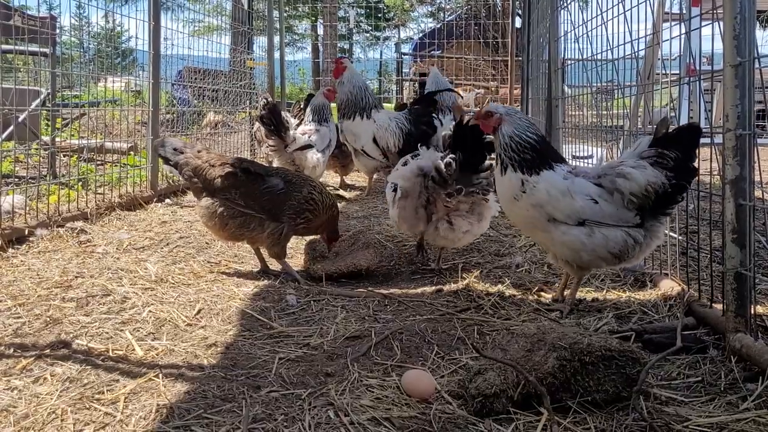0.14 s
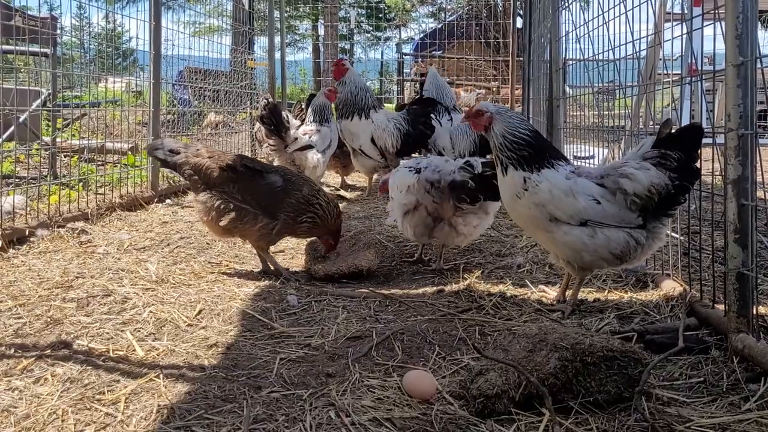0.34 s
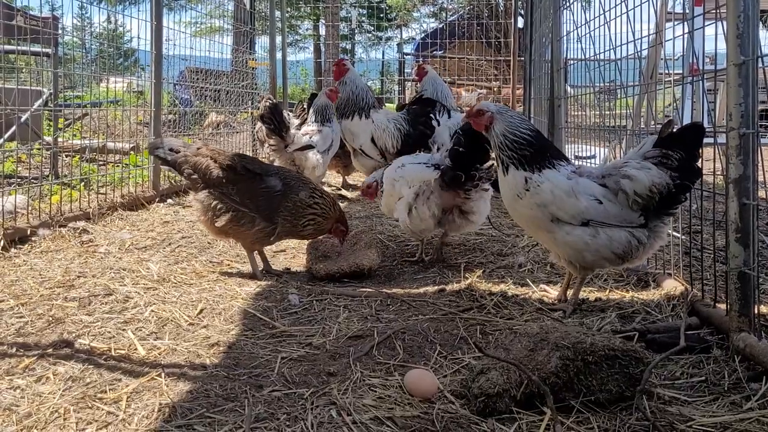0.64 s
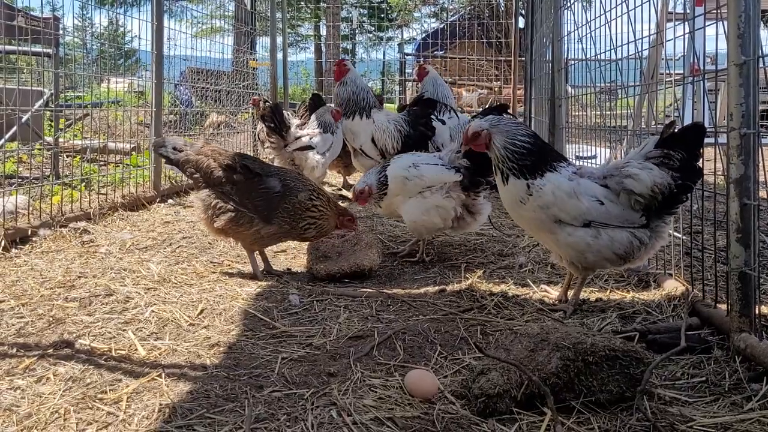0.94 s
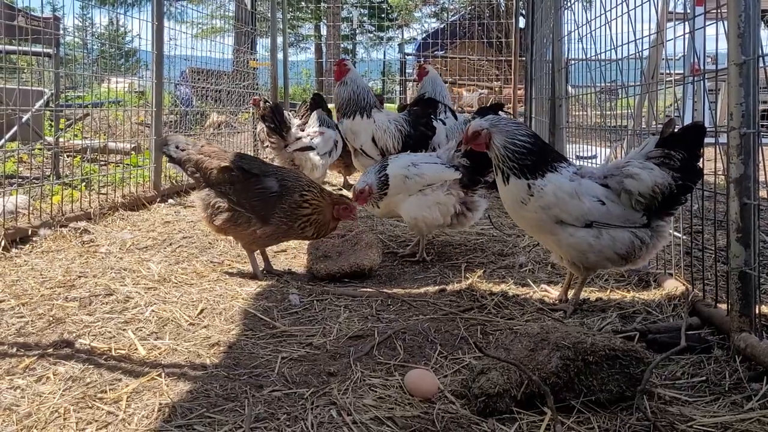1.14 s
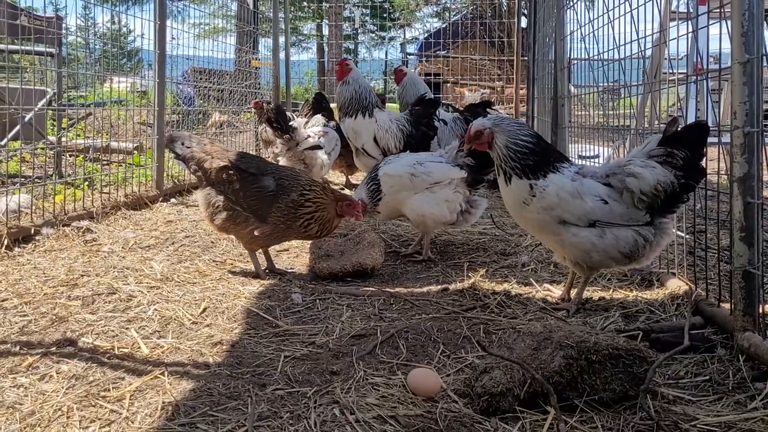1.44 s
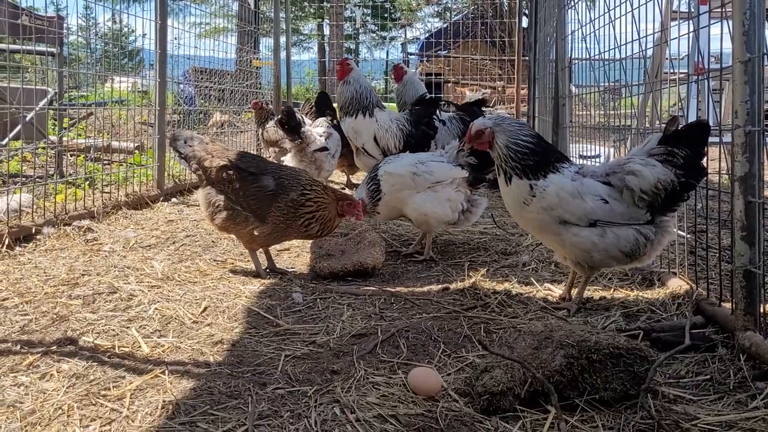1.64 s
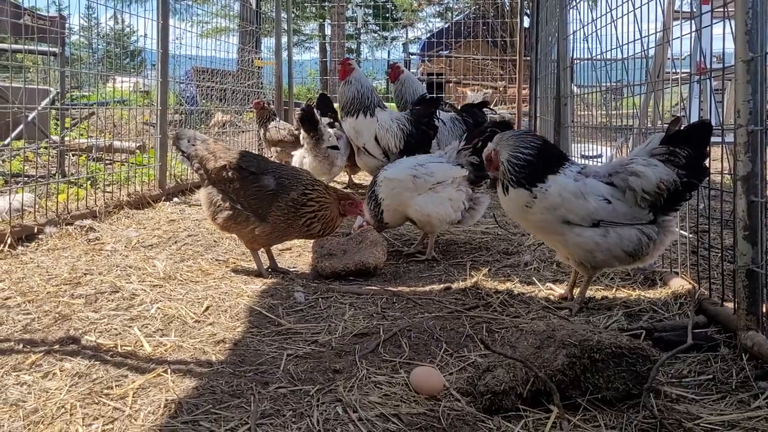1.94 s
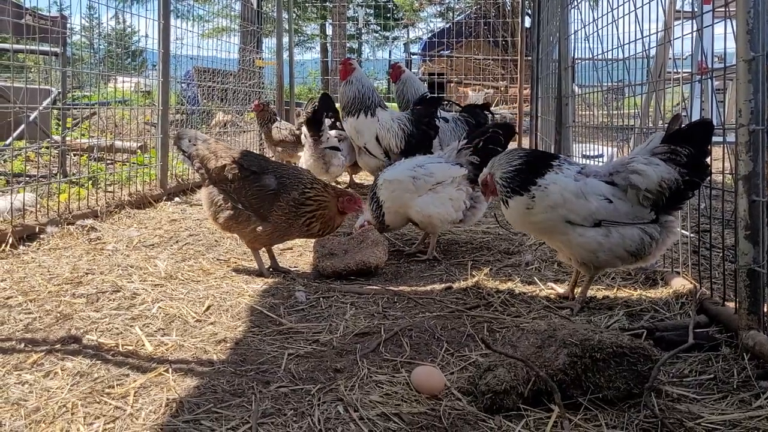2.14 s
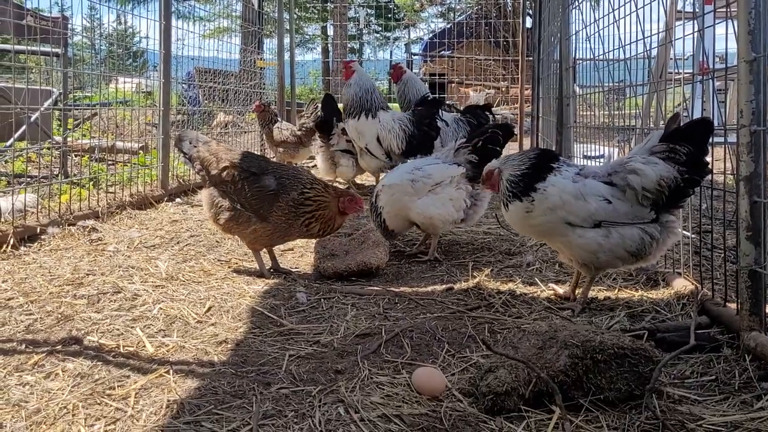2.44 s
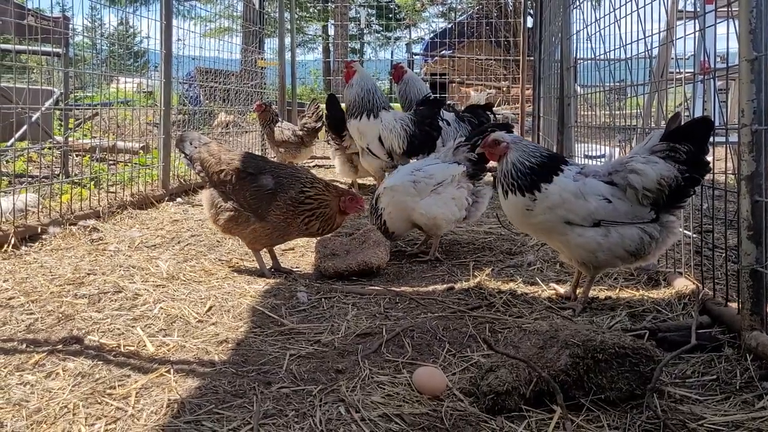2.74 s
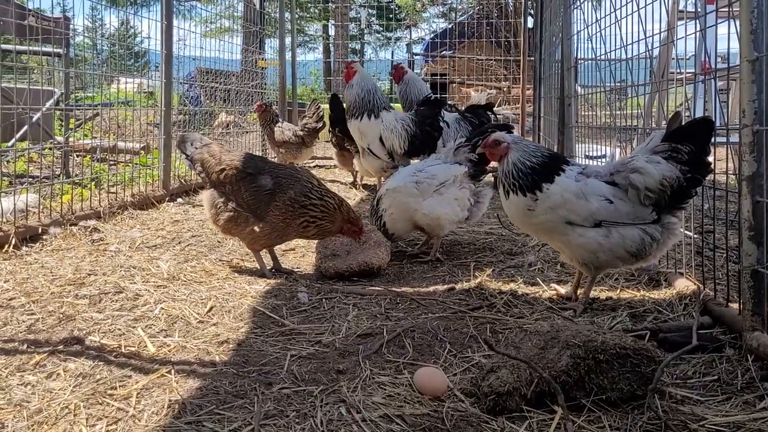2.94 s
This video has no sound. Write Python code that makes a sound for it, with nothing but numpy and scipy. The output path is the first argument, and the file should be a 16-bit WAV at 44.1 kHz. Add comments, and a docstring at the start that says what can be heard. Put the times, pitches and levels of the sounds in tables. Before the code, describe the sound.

Close chicken clucks outdoors: a quick cluster, a brief bright squawk from a second hen, a sparse gap, then regular clucks to the end. Wind buffets mostly the left side of the stereo microphone; faint bird whistles behind.

```python
"""An outdoor wire pen: a hen close by clucks, irregularly at first, then in an even run.
Rough pulses and breath ring its throat; a second voice gives one long cackle of summed harmonics plus rasp.
A farther hen clucks softly, a small bird whistles gliding, mostly falling sines, and beaks tick on dry feed.
Wind is gust-shaped low noise, mostly in the left microphone port, over a faint noise of the yard."""
import sys
import numpy as np
from scipy import signal
from scipy.fft import rfft, irfft, next_fast_len
from scipy.io import wavfile
from scipy.ndimage import map_coordinates

SR = 44100
rng = np.random.default_rng(int(sys.argv[2]) if len(sys.argv) > 2 else 0)


def dump(signal):
    """Clip the signal to [-1, 1] and save it as 16-bit WAV at the path in sys.argv[1]."""
    limited = np.clip(np.atleast_2d(signal).T, -1, 1)
    pcm = np.round(limited * 32767).astype(np.int16)
    wavfile.write(sys.argv[1], SR, pcm)


N = 136710
T = np.arange(N) / SR  # seconds

# Clucks of the near hen. Each row: start in seconds, length in seconds, level in dB, top pitch in Hz,
# roughness 0-1, period doubling 0-1, gain at 1.5-2.9 kHz in dB, peak time as a share of the length,
# gain above 2.9 kHz in dB, gain below 560 Hz in dB.
NEAR_CLUCKS = [(-.02, .065, -27, 471.2, 0.45, 0.09, 7.5, 0.37, 5, -4.5),
               (.11, 0.068, -25.5, 373.8, 0.31, 0.59, -2.5, 0.5, -6.5, -10.5),
               (.239, 0.037, -25.5, 397.4, 0.64, 0.56, 0, 0.32, -4, -6.5),
               (.44, 0.042, -28.5, 380.7, 0.58, 0.23, -8, 0.337, -7, -6),
               (.942, 0.065, -36, 377.3, 0.49, 0.33, 5.5, 0.6, -12, 7.5),
               (1.195, 0.061, -29, 432, 0.36, 0.32, -1.5, 0.48, -1, -2.5),
               (1.415, 0.064, -33.5, 401.3, 0.54, 0.19, 2, 0.51, -10, 5),
               (1.638, 0.066, -28.5, 446.2, 0.3, 0.27, 8, 0.57, 2, 2),
               (1.853, 0.068, -29.5, 434.5, 0.42, 0.38, 6, 0.44, 1, 2),
               (2.071, 0.076, -32.5, 274, 0.62, 0.28, 3, 0.3, 2, -1),
               (2.312, 0.07, -23.5, 459.3, 0.29, 0.46, 5.5, 0.48, 2, -3.5),
               (2.563, 0.07, -26.5, 448.5, 0.33, 0.39, 5, 0.6, 1, 2.5),
               (2.803, 0.066, -28, 444.2, 0.32, 0.51, 4, 0.5, -4.5, 2),
               (3.034, 0.067, -26, 447, 0.33, 0.45, 2, 0.56, -5.5, 2.5)]
# Throat resonances of the near hen. Each row: centre in Hz, width in Hz, gain in dB.
NEAR_THROAT = [(397.44, 740, -5), (766, 640, 1), (1210, 270, -10.5), (2172, 560, 0), (3120, 146, -11.5),
               (4085, 860, -11), (5820, 1110, -14), (6800, 1250, -13.5), (10900, 2000, -30),
               (15000, 4400, -34)]
BANDS_HZ = (560, 1500, 2900)  # borders of the bands that each cluck weights
START_PITCH, END_PITCH = 0.57, 0.56  # shares of the top pitch
EDGE_DB, EDGE_ROUGH = -13.5, 1.004  # at a cluck's edges: level change, added share of its roughness
EDGE_DULL_DB, EDGE_AIR_DB = -9, -20  # at the edges: change in the 1.5-2.9 kHz band and above it
JITTER = 0.065  # pitch deviation, as a share, at roughness 1
PULSE_SPREAD = 0.3485  # radians per squared harmonic number: smears each pulse
CLUCK_DRIFT_DB, OVERTONE_DRIFT_DB = 1.5, 4  # slow drift of each harmonic

# Course of the cackle. Each row: time in seconds, pitch in Hz, level of the fundamental in dB,
# level of the second harmonic in dB, level of the higher harmonics in dB.
CACKLE_COURSE = [(0.26, 792, -46, -35.5, -57), (0.272, 750, -19, -34, -56), (0.276, 759.3, -18.5, -61, -39),
                 (0.288, 759.4, -18, -47, -42), (0.297, 807, -28, -29, -32), (0.306, 818, -42, -32, -30),
                 (0.315, 794, -28, -34, -40.5), (0.326, 815.3, -41, -26, -31),
                 (0.349, 804.6, -29, -39.5, -29), (0.375, 807.3, -32, -27, -26),
                 (0.389, 790.3, -23.5, -29, -32), (0.431, 781.5, -21, -26, -29.5),
                 (0.451, 765.6, -22.5, -34, -38), (0.471, 680, -32, -66, -66)]
# Voice irregularity in the cackle. Each row: time in seconds, roughness 0-1, period doubling 0-1.
CACKLE_HOARSENESS = [(.26, .2, .3), (.286, .1, .2), (.296, .04, .55), (.335, .03, .5), (.35, .025, .05),
                     (.43, .025, .04), (.45, .07, .1), (.47, .2, .1)]
# Relative levels in dB of harmonics 3, 4, 5 and up.
UPPER_HARMONICS_DB = [0, -11.5, -4.5, -16.5, -11, -19.5, -25.5, -25, -33.5, -33.5, -39, -43, -30.5, -31,
                      -37, -29, -36]
# Resonances that colour the rasp. Each row: centre in Hz, width in Hz, gain in dB.
RASP_RESONANCES = [(764, 410, -3), (1636, 510, -2), (2780, 620, -6.5), (3690, 800, 1.5), (6540, 510, -19),
                   (7560, 1300, -34), (12100, 3600, -36.5)]
# Strength of the rasp. Each row: time in seconds, level in dB.
RASP_COURSE = [(.26, -24.5), (.288, -24), (.3, -28.5), (.335, -33.5), (.35, -57), (.43, -52), (.455, -30.5),
               (.47, -41)]
# Resonances of air hissing past the beak. Each row: centre in Hz, width in Hz, gain in dB.
HISS_RESONANCES = [(7000, 1700, -3), (13400, 2800, -1)]
HISS_DB, CACKLE_LOW_HZ = -59, 600  # hiss level; low cut of the harmonics

# Clucks of the farther hen. Each row: start in seconds, length in seconds, level in dB.
FAR_CLUCKS = [(0.581, .04, -49), (0.724, 0.042, -47.5), (0.859, 0.045, -58), (1.38, 0.066, -63.5),
              (1.947, 0.04, -73), (2.388, .04, -60), (2.651, 0.046, -57.5), (2.906, 0.038, -62),
              (2.981, 0.038, -56)]
# Throat resonances of the farther hen. Each row: centre in Hz, width in Hz, gain in dB.
FAR_THROAT = [(2330, 900, 0.5), (2390, 300, -4.5), (4450, 1300, -13), (1470, 240, -13)]
FAR_HZ, FAR_ROUGH = 435, 0.1  # top pitch, roughness 0-1

# Beaks on dry feed. Each row: start in seconds, initial level in dB before resonance.
BEAK_TICKS = [(1.57, -57), (1.604, -60), (1.6235, -59), (1.7835, -58)]
# Notes of the small bird. Each row: start in seconds, length in seconds, first pitch in Hz,
# middle pitch in Hz, last pitch in Hz, level in dB.
BIRD_NOTES = [(.772, 0.019, 4157, 4150, 4070, -55.5), (1.818, 0.019, 3050, 3000, 2900, -67),
              (2.266, 0.033, 2750, 2530, 2400, -64), (2.74, 0.036, 3192, 3430, 3800, -63),
              (0.811, 0.036, 3700, 2870, 2340, -59.5), (0.895, 0.031, 3780, 2800, 2770, -57),
              (1.394, 0.058, 3045, 3270, 3076, -63), (1.489, 0.077, 4050, 3460, 2500, -54.5),
              (1.55, 0.037, 2460, 2250, 2190, -55.5), (1.572, 0.032, 3200, 3190, 3146, -66),
              (1.697, 0.071, 3740, 2850, 2100, -56.5), (2.026, 0.092, 2970, 3212, 2870, -56.5),
              (2.221, 0.081, 3270, 3003, 2660, -59), (2.389, 0.033, 3330, 3095, 2900, -55),
              (2.53, 0.048, 3047, 3217, 2927, -56.5), (2.621, 0.031, 3360, 3160, 2820, -49),
              (2.769, 0.043, 3855, 3390, 2730, -48.5), (2.96, 0.058, 3770, 3250, 2260, -51)]
WAVER, WAVER_DB = 0.014, 3  # unsteadiness of pitch as a share, and of level

# Gusts. Each row: time in seconds, relative strength in dB, left over right in dB.
GUSTS = [(0.0, -56, 7), (0.05, -43, 14), (0.09, -56, 15), (0.13, -37.5, 19.5), (0.21, -30, 45),
         (0.27, -71.5, 5), (0.33, -59, 3), (0.36, -33.5, 17.5), (0.42, -36.5, 35), (0.46, -32.5, 26),
         (0.6, -37, 25), (0.74, -28.5, 44), (0.81, -30, 19), (0.93, -53, 17), (1.07, -43, 36),
         (1.16, -48.5, -5.5), (1.3, -59, 11), (1.5, -50.5, 19), (1.55, -62.5, 1), (2.24, -60, 3),
         (2.3, -42.5, 34), (2.35, -60, 0), (2.5, -54.5, 18), (2.68, -40, 0.5), (2.71, -61, 3),
         (2.74, -35.5, -15), (2.8, -35, -5), (2.93, -51.5, -2.5), (3.06, -39, -4), (3.1, -48, 10)]
# Spectrum of the slow wind pressure. Each row: frequency in Hz, relative density in dB per Hz.
RUMBLE_SPECTRUM = [(20, -1.5), (70, 8.5), (120, -6), (178, -20.5), (214, -29), (300, -11.5), (390, -86),
                   (660, -120)]
# Spectrum of the faster wind flutter. Each row: frequency in Hz, relative density in dB per Hz.
FLUTTER_SPECTRUM = [(35, -12.5), (60, -19), (124, -0.5), (168, -11), (236, -8.5), (850, -49), (1170, -84),
                    (1980, -120)]
FLUTTER_DB = -0.5  # flutter over rumble in the strongest gust
FLUTTER_GROWS, LUMPY_DB = 2, 4  # dB of flutter per dB of gust; depth of the lumps in dB

# Spectrum of the yard. Each row: frequency in Hz, relative density in dB per Hz.
YARD_SPECTRUM = [(71, -27), (120, 3), (376, -6.5), (722, -8), (850, -3.5), (1420, -7.5), (1920, -9.5),
                 (2170, -14.5), (2720, -12.5), (3010, -17), (5010, -18), (15700, -35)]
# Likeness of the yard at the two ports. Each row: frequency in Hz, left-right correlation.
YARD_LIKENESS = [(130, 1), (300, 1), (640, 0.47), (1400, -0.57), (3100, 0.082), (15000, -0.18)]
YARD_DB = -57.0

# Balance of the ports for most sources. Each row: frequency in Hz, left over right in dB.
PORT_BALANCE = [(250, 3), (700, -4), (1300, 6.5), (2400, 11), (4400, -1.5), (9000, -3), (15000, 0)]
# Balance of the ports for the cackle. Each row: frequency in Hz, left over right in dB.
CACKLE_BALANCE = [(400, 1), (800, -6.5), (1600, 0.5), (2400, 1.5), (4400, 6), (8000, -5), (15000, -2)]
# Decay in the pen and sheds. Each row: frequency in Hz, time to fall 60 dB in seconds.
PEN_DECAY = [(300, 0.29), (2000, 0.68), (6000, 0.53), (12000, 0.59)]
SCATTER_S = 0.022  # scatter from ground, posts and other hens falls 30 dB in this time
SCATTER_DB, CACKLE_SCATTER_DB = -6, -12
NEAR_WET_DB, CACKLE_WET_DB, FAR_WET_DB, BIRD_WET_DB = -18.5, -21, -6, -8  # reverberant tail
# Seconds by which the left port leads (negative: lags), then left-over-right phase in radians.
LEAD_S, CACKLE_LEAD_S, FAR_LEAD_S, BIRD_LEAD_S = 0.00025, 0.0001, 0.00069, -0.0004
NEAR_TURN, CACKLE_TURN = -0.25, 0.64


def amp(db):
    """Decibel definition: the amplitude ratio of a level in dB."""
    return 10 ** (np.asarray(db) / 20)


def unit(x):
    """Normalisation: scales x to an rms of 1."""
    return x / np.sqrt(np.mean(x ** 2) + 1e-20)


def along(points, hz):
    """Interpolation on a logarithmic frequency axis through (Hz, value) points."""
    f, value = np.transpose(points)
    return np.interp(np.log(hz + 1), np.log(f + 1), value)


def curves(rows):
    """Linear interpolation in time: one curve for each column after the first."""
    times, *columns = np.transpose(rows)
    return [np.interp(T, times, column) for column in columns]


def wobble(rate):
    """Band-limited random drift: a smooth curve through rate random knots a second."""
    return map_coordinates(rng.standard_normal(int(N * rate / SR) + 4), [T * rate])


def filtered(x, response):
    """Linear filtering: multiplies the spectrum by a complex response of frequency."""
    size = next_fast_len(N + 8192)
    hz = np.fft.rfftfreq(size, 1 / SR)
    return irfft(rfft(x, size) * response(hz), size)[..., :N]


def resonances(peaks):
    """Resonance: the summed power of steep second-order peaks, as a gain without phase."""
    def gain(f):
        power = 0
        for centre, width, db in peaks:
            damping = (f * width) ** 2
            power = power + (amp(db) * damping / ((centre ** 2 - f ** 2) ** 2 + damping)) ** 2
        return np.sqrt(power)
    return gain


def coloured(spectrum):
    """Spectral shaping: two independent noises, scaled together to an rms of 1."""
    return unit(filtered(rng.standard_normal((2, N)), lambda hz: amp(along(spectrum, hz))))


def membrane_phase(hz, rough):
    """Frequency jitter: the phase of a membrane is the sum of its unsteady pitch."""
    return 2 * np.pi * np.cumsum(hz * (1 + JITTER * rough * wobble(350.8))) / SR


def hoarse(tone, turn, rough, doubling):
    """Period doubling and turbulence: uneven, alternating cycles, and a puff of breath noise in each."""
    uneven = amp(5.8 * np.minimum(rough, 1) * wobble(250)) * (1 + doubling * np.cos(turn / 2))
    breath = uneven * (1 + 0.29 * np.cos(turn)) * rng.standard_normal(N)
    return uneven * tone, breath


def clucking(rows, throat):
    """Source and filter: pulses of arching pitch and level, with breath, ring the throat."""
    gain, hz, rough, doubling = np.zeros(N), np.full(N, 300.0), np.zeros(N), np.zeros(N)
    chest, treble, air = np.ones(N), np.ones(N), np.ones(N)
    for s, length, db, top_hz, r, d, treble_db, peak, air_db, chest_db in rows:
        on = (T >= s) & (T < s + length)
        u = (T[on] - s) / length
        off = np.where(u < peak, 1 - u / peak, (u - peak) / (1 - peak))  # 0 at the peak, 1 at the edges
        ramp = np.minimum(1, 6 * np.minimum(u, 1 - u))
        gain[on] = amp(db + EDGE_DB * off ** 1.8) * ramp
        edge_pitch = np.where(u < peak, START_PITCH, END_PITCH)
        hz[on] = top_hz * (1 - off ** 3 * (1 - edge_pitch))
        rough[on] = r * (1 + EDGE_ROUGH * off ** 2)
        doubling[on] = d
        chest[on] = amp(chest_db)
        treble[on] = amp(treble_db + EDGE_DULL_DB * off)
        air[on] = amp(air_db + EDGE_AIR_DB * off)

    turn = membrane_phase(hz, rough)
    pulses = np.zeros(N)
    for k in range(1, 22):
        drift = amp(CLUCK_DRIFT_DB * wobble(24.93))
        pulses += drift * np.cos(k * turn + PULSE_SPREAD * k * k) / (1 + (k / 11) ** 4)
    tone, breath = hoarse(pulses / 12, turn, rough, doubling)
    source = tone + filtered(rough * breath, lambda f: 0.45 + f / 20000)

    deep, low, middle = [filtered(source, lambda f: 1 / (1 + (f / border) ** 4)) for border in BANDS_HZ]
    source = chest * deep + (low - deep) + treble * (middle - low) + air * (source - middle)
    # The rms without the level curve is the reference for the levels.
    plain = filtered(source * (gain > 0), resonances(throat))[gain > 0]
    return filtered(source * gain, resonances(throat)) / np.sqrt(np.mean(plain ** 2))


def cackle():
    """Harmonic synthesis: a rasping onset, then a clear stack of harmonics whose pitch sags."""
    hz, first_db, second_db, upper_db = curves(CACKLE_COURSE)
    rough, doubling = curves(CACKLE_HOARSENESS)
    rasp_db, = curves(RASP_COURSE)
    turn = membrane_phase(hz, rough)
    upper = np.zeros(N)
    for k, db in enumerate(UPPER_HARMONICS_DB, start=3):
        upper += amp(db + OVERTONE_DRIFT_DB * wobble(20.36)) * np.cos(k * turn + k * k)
    stack = amp(first_db) * np.cos(turn) + amp(second_db) * np.cos(2 * turn) + amp(upper_db) * upper
    tone, breath = hoarse(np.sqrt(2) * stack, turn, rough, doubling)  # root 2: levels are rms
    tone = filtered(tone, lambda f: 1 / (1 + (CACKLE_LOW_HZ / (f + 1)) ** 8))
    rasp = amp(rasp_db) * unit(filtered(breath, resonances(RASP_RESONANCES)))
    hiss = amp(HISS_DB) * unit(filtered(breath, resonances(HISS_RESONANCES)))
    start, end = CACKLE_COURSE[0][0], CACKLE_COURSE[-1][0]
    gate = np.clip(np.minimum(T - start, end - T) / 0.002, 0, 1)  # 2 ms ramps
    return gate * (tone + rasp + hiss)


def beak_ticks():
    """Impact excitation: noise falling 60 dB in 9.2 ms, coloured by broad resonances."""
    envelope = sum(amp(db - 60 * np.abs(T - s) / 0.0092) * (T >= s) for s, db in BEAK_TICKS)
    return filtered(envelope * rng.standard_normal(N), resonances([(5400, 3200, 15.0), (10200, 10000, -1.5)]))


def far_clucks():
    """Source and filter again: the farther hen's clucks share one top pitch and shape."""
    rows = [(s, length, db, FAR_HZ, FAR_ROUGH, 0, 0, 0.35, 0, 0) for s, length, db in FAR_CLUCKS]
    return clucking(rows, FAR_THROAT)


def whistles():
    """Frequency modulation: thin sines glide along parabolas, a little unsteady."""
    out, shake, flicker = np.zeros(N), wobble(110), amp(WAVER_DB * wobble(90))
    for s, length, first_hz, mid_hz, last_hz, db in BIRD_NOTES:
        on = (T >= s) & (T < s + length)
        u = (T[on] - s) / length
        glide = np.polyval(np.polyfit([0, 0.5, 1], [first_hz, mid_hz, last_hz], 2), u)
        hz = glide * (1 + WAVER * shake[on])
        out[on] += amp(db) * np.sqrt(np.sin(np.pi * u)) * np.sin(2 * np.pi * np.cumsum(hz) / SR)
    return out * flicker


def lumps(rate):
    """Amplitude modulation: an independent uneven gain for each port."""
    return amp(LUMPY_DB * np.array([wobble(rate), wobble(rate)]))


def wind():
    """Turbulent pressure: lumpy low noise at each port, with a flutter that outgrows the gusts."""
    strength_db, pan_db = curves(GUSTS)
    # Split the power of each gust between the ports.
    port_db = strength_db + 11.5 - 10 * np.log10(1 + amp([-2 * pan_db, 2 * pan_db]))
    rumble = unit(lumps(24.98) * coloured(RUMBLE_SPECTRUM))
    flutter_db = FLUTTER_DB + (FLUTTER_GROWS - 1) * (port_db - port_db.max())
    flutter = amp(flutter_db) * unit(lumps(44.45) * coloured(FLUTTER_SPECTRUM))
    gusts = amp(port_db) * (rumble + flutter)
    return filtered(gusts, lambda hz: hz ** 3 / (hz ** 3 + 35 ** 3) / (1 + (hz / 500) ** 4))


def yard():
    """Partial coherence: distant rustle and hum, mixed from common and opposed noise at the ports."""
    def shares(hz):
        angle = np.arccos(np.clip(along(YARD_LIKENESS, hz), -1, 1)) / 2
        return np.array([np.cos(angle), np.sin(angle)])
    mid, side = filtered(coloured(YARD_SPECTRUM), shares)
    return amp(YARD_DB + 1.2 * wobble(3.16)) * np.array([mid + side, mid - side])


def placed(x, lead_s, wet_db, scatter_db, balance=PORT_BALANCE, turn=0):
    """Interaural-style cues and reverberation: direct sound, nearby scatter, answer of pen and sheds."""
    side = np.array([[1], [-1]])  # left, right

    def ports(hz):
        phase = side * (np.pi * hz * lead_s + turn / 2)
        return amp(side * along(balance, hz) / 2) * np.exp(1j * phase)
    direct = filtered(x, ports)
    hz, t, z = signal.stft(rng.standard_normal((2, SR // 2)), SR, nperseg=256)
    decay = amp(-60 * t / along(PEN_DECAY, hz)[:, None])
    tail = signal.istft(z * decay, SR, nperseg=256)[1]
    fade = amp(-30 * np.arange(tail.shape[1]) / SR / SCATTER_S)
    scatter = rng.standard_normal(tail.shape) * fade
    answer = amp(wet_db) * tail / np.linalg.norm(tail[0])
    answer = answer + amp(scatter_db) * scatter / np.linalg.norm(scatter[0])
    delayed = np.pad(x, (60, 0))[None]  # 60 samples behind the direct sound
    return direct + signal.fftconvolve(delayed, answer, axes=1)[:, :N]


def scene():
    """Superposition: near hens, farther hen, small bird, wind and yard add at the two ports."""
    near = placed(clucking(NEAR_CLUCKS, NEAR_THROAT) + beak_ticks(), LEAD_S, NEAR_WET_DB, SCATTER_DB,
                  turn=NEAR_TURN)
    call = placed(cackle(), CACKLE_LEAD_S, CACKLE_WET_DB, CACKLE_SCATTER_DB, CACKLE_BALANCE, CACKLE_TURN)
    far = placed(far_clucks(), FAR_LEAD_S, FAR_WET_DB, SCATTER_DB)
    bird = placed(whistles(), BIRD_LEAD_S, BIRD_WET_DB, SCATTER_DB)
    return near + call + far + bird + wind() + yard()


def record(dry):
    """Band limitation: the microphone channel passes nothing from 15.78 kHz up."""
    return filtered(dry, lambda hz: hz < 15780)


dry = scene()
out = record(dry)
dump(out)
```